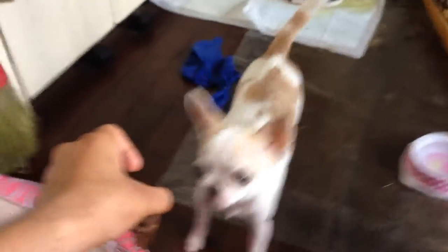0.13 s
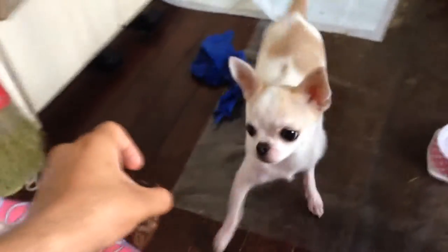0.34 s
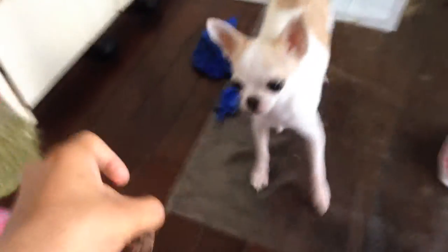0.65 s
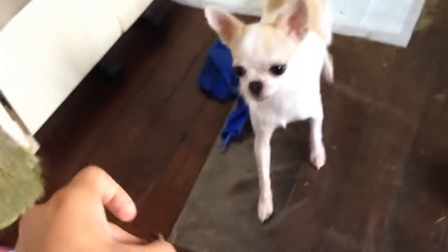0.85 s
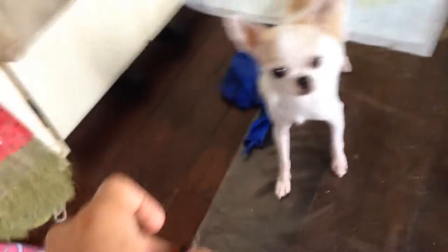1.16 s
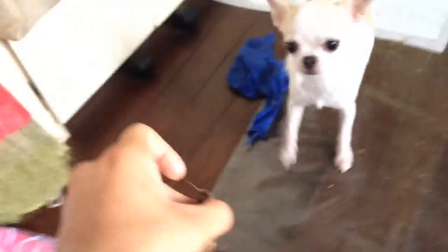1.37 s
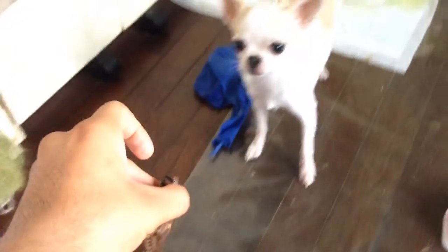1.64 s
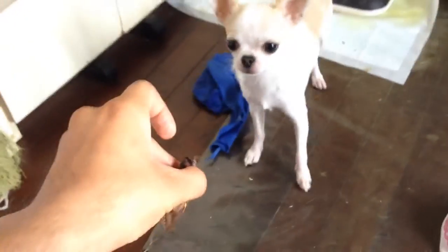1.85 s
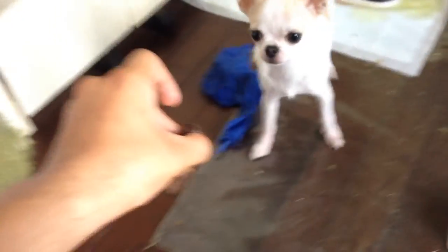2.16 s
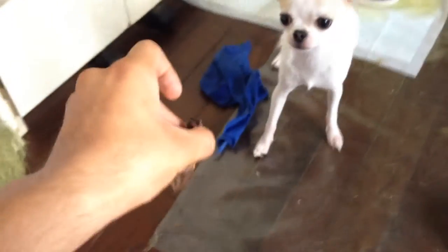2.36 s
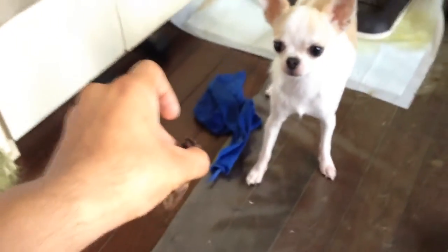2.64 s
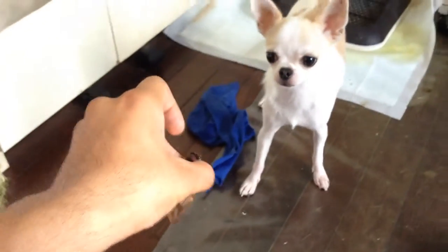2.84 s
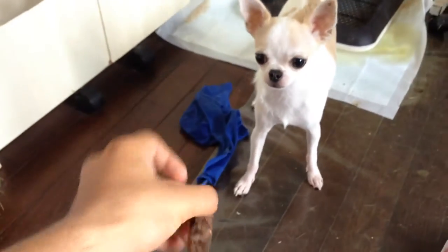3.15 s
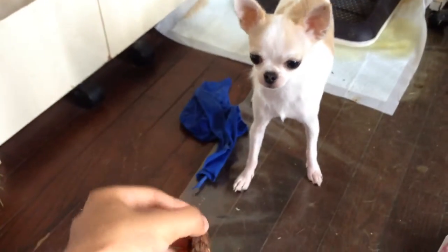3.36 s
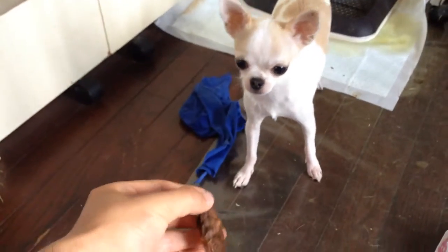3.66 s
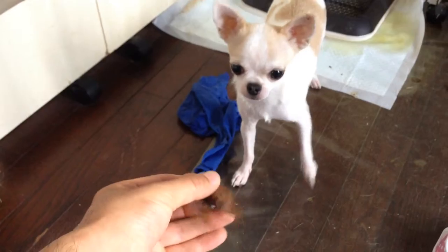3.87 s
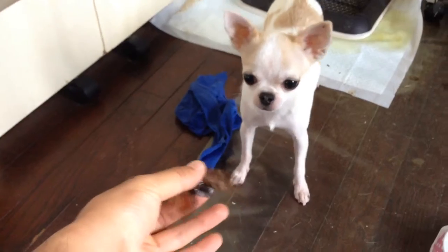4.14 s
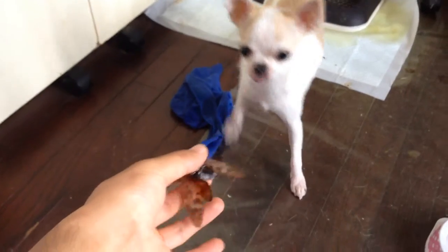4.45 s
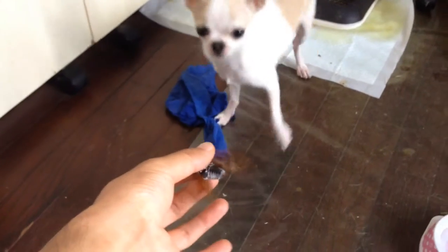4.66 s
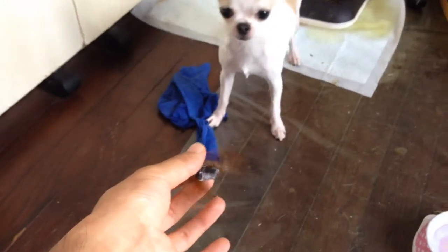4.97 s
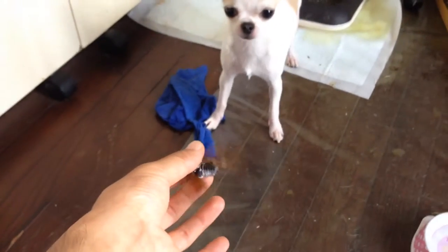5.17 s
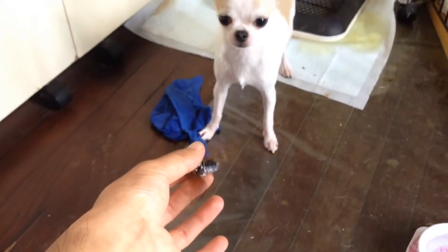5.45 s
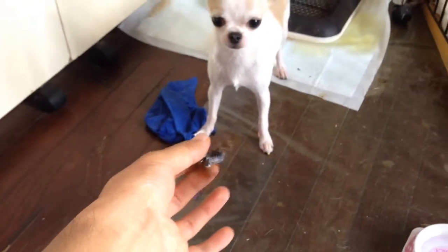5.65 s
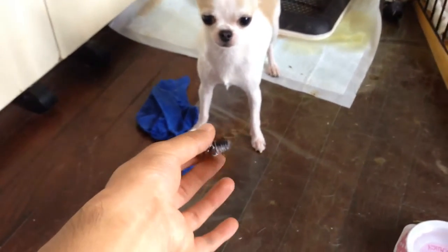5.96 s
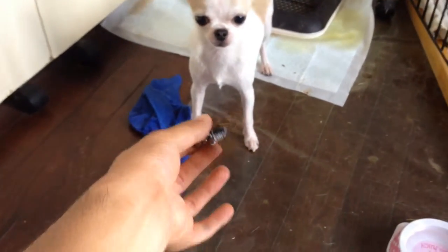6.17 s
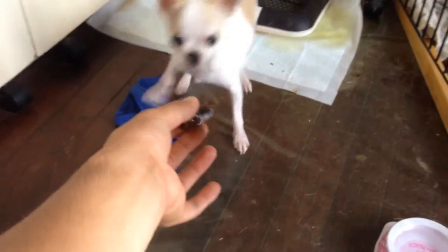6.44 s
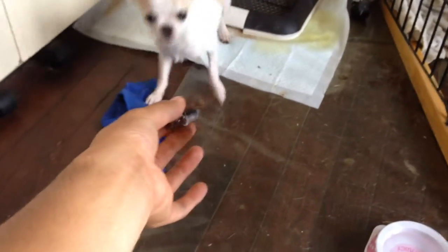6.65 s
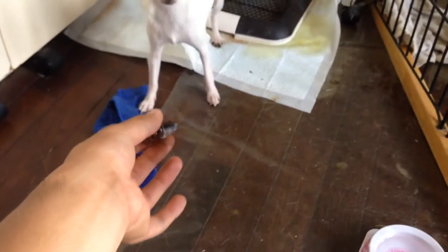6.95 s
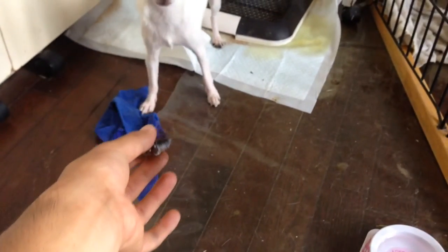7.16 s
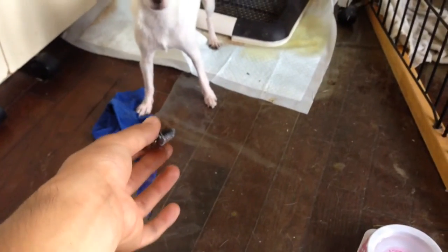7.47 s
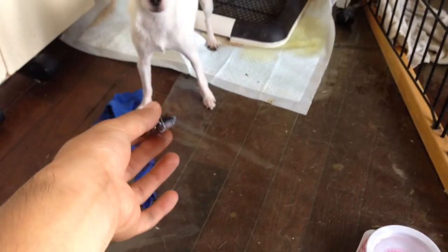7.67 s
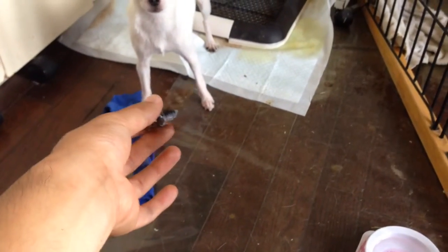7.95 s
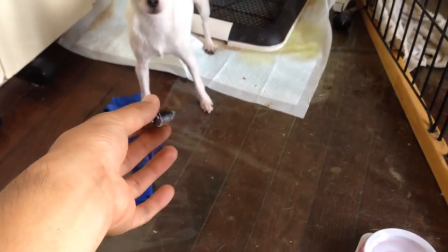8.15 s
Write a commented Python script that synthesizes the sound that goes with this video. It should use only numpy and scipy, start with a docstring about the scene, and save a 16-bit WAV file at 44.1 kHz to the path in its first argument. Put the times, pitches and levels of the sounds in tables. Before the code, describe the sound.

In a quiet room, a small dog steps softly on a wooden floor, a hand brushes cloth, and something hard clinks faintly twice. About three seconds in, a large cicada held in the fingers gives a few dry clicks and broken bursts, then buzzes loudly almost without a gap. The shrill buzz is close to the microphone and keeps dipping in pitch and snapping back, with a faint wing flutter beneath it.

```python
"""A quiet room with a wooden floor: a small dog steps about, a hand brushes cloth, something clinks twice.
Then a large cicada, held in the fingers, gives a few clicks, stutters and buzzes on with barely a gap.
Its two tymbals buckle in turn; each click rings higher and brighter the harder the insect tenses them.
The hollow abdomen colours the clicks and hums along, while the wings flutter against the fingers."""
import sys
import numpy as np
from scipy import signal
from scipy.fft import rfft, irfft
from scipy.io import wavfile
from scipy.ndimage import uniform_filter1d, minimum_filter1d

SR = 44100
rng = np.random.default_rng(int(sys.argv[2]) if len(sys.argv) > 2 else 0)


def generate_wav(signal):
    """Clip the signal to [-1, 1] and save it as 16-bit WAV at the path in sys.argv[1]."""
    frames = np.transpose(np.atleast_2d(signal))
    scaled = np.clip(frames, -1, 1) * 32767
    pcm = np.round(scaled).astype(np.int16)
    wavfile.write(sys.argv[1], SR, pcm)


N = 366471

# room tone colour: f/Hz, level/dB
AIR_EQ = [(25, -14), (50, 2), (95, 9), (170, 0.5), (260, 0.5), (450, -3), (800, -10), (1300, -9),
          (2400, -7), (5000, -11.5), (15000, -19.5)]
# room tone fader: t/s, level/dB
AIR_FADER = [(0, -60), (1.2, -60), (2.6, -62.5), (3.2, -62), (3.4, -67), (4.6, -76), (5.3, -69.5),
             (6.1, -67.5), (8.3, -63)]
# colour of skin on cloth: f/Hz, level/dB
CLOTH_EQ = [(60, -16), (200, -7.5), (520, 0), (1100, -8), (2600, -2.5), (4600, -3.5), (8000, -10),
            (15000, -17)]
# hand strokes at their fastest: t/s, level/dB, half length/s
CLOTH_STROKES = [(0.562, -59, 0.067), (0.773, -40.5, 0.081), (0.936, -63.5, 0.077), (1.365, -60, 0.045)]
# paws and claws on the boards: t/s, level/dB, centre f/Hz, spread/octaves, t60/s
PAW_STEPS = [(0.809, -45.5, 80, 0.71, 0.5), (0.821, -37, 270, 0.52, 0.23), (.82, -38.5, 690, 1.1, 0.065),
             (.97, -45, 76, 0.47, 0.28), (1.004, -57, 723, 1.03, 0.057), (1.068, -50.5, 2000, 1.3, 0.075),
             (1.077, -40.5, 746, 0.58, 0.071), (1.124, -43.5, 100, 0.71, 0.086),
             (1.612, -54, 1690, 1.06, 0.16), (1.698, -45.5, 7500, 1.5, 0.025),
             (2.091, -55, 109, 0.24, 0.11), (2.213, -43.5, 566, 0.15, 0.045),
             (2.214, -57.5, 1270, 0.18, 0.36), (2.214, -64.5, 2800, .6, 0.52),
             (2.4, -57.5, 1800, 0.77, .05)]
# contacts that make up the clinks: t/s, level/dB, scrape t60/s
CLINK_HITS = [(2.75, -46, 0.034), (2.758, -44.5, 0.24), (2.984, -50.5, 0.49)]
# modes of the clinking thing: f/Hz, relative level/dB, t60/s
CLINK_RING = [(2467, 16.5, 0.057), (2800, 5, 0.14), (4996, -18, 0.18), (6100, -13, 0.16), (8950, 0, 0.13)]
# colour of its scrape: f/Hz, level/dB
SCRAPE_EQ = [(300, -29), (1200, -13), (2500, 2.5), (5000, 0.5), (7500, -9.5), (10000, -11), (14000, -26)]

# tension the insect aims for, as tymbal ring pitch: t/s, f/Hz
TENSION_AIM = [(3.22, 4320), (3.272, 6410), (3.298, 5310), (3.53, 5000), (3.575, 5890), (3.612, 5280),
               (3.646, 6840), (3.73, 8020), (3.81, 7094), (4.7, 6790), (7, 6929), (8.3, 6663)]
# the muscle gives way and catches up: slackest t/s, sink time/s, depth/Hz, overshoot/Hz
TENSION_SAGS = [(3.868, 0.008, 663, 4), (3.963, 0.074, 500, -5), (4.206, 0.0092, 462, 0),
                (4.356, 0.0076, 650, 300), (4.48, 0.098, 1118, 752), (4.636, 0.047, 399, 159),
                (4.783, 0.019, 1060, 345), (4.953, 0.018, 550, 543), (5.126, 0.12, 1644, 1001),
                (5.19, 0.01, 794, -0.5), (5.412, 0.0096, 500, 9.5), (5.637, 0.015, 1050, 548),
                (5.75, 0.032, 1050, 748), (5.864, 0.061, 1930, 951.5), (5.986, 0.024, 552, -6),
                (6.093, 0.01, 900, 302.5), (6.182, 0.028, 1565, 397.5), (6.299, 0.033, 608, -2),
                (6.422, 0.012, 1103, -5.5), (6.566, 0.028, 1363, 204), (6.866, 0.054, 702.5, 51.5),
                (6.932, 0.01, 707, 2), (7.056, 0.057, 300.6, 1050), (7.16, 0.11, 702, 955.5),
                (7.328, 0.12, 1434, 1293), (7.457, 0.097, 605, 255), (7.55, 0.082, 498.4, 947.5),
                (7.652, 0.044, 1066, 397), (7.829, 0.045, 1554, 504), (7.933, 0.033, 1713, 748),
                (8.112, 0.009, 395.7, 9), (8.218, 0.015, 148.9, 740)]
# pace of both tymbals at singing tension, tiring slowly: t/s, click rate/Hz
CLICK_PACE = [(3.23, 410), (3.41, 340), (3.57, 395), (3.8, 364), (4.4, 353), (5, 349), (5.6, 333),
              (6.5, 346), (7.7, 339), (8.3, 345)]
# colour of the wing flutter: f/Hz, level/dB
WING_EQ = [(60, -17), (200, -7.5), (400, -6.5), (800, -3.5), (1600, -2.5), (3000, 0.5), (10000, -39)]
# the shaking body: t/s, flutter level/dB, thrum level/dB
BODY_SHAKE = [(3.1, -82, -100), (3.3, -57.5, -100), (3.75, -69.5, -97), (4, -55.5, -93), (4.3, -62, -81),
              (5.1, -61, -85), (5.45, -61.5, -74), (6.1, -57, -65.5), (7.1, -59.5, -74), (7.5, -57, -67),
              (8.3, -60.5, -71)]
# the abdomen's hum: t/s, resonance at singing tension f/Hz, level/dB, stroke unsteadiness/ratio
ABDOMEN_HUM = [(3.5, 2490, -48, .004), (3.62, 2630, -44, 0.0017), (3.8, 2630, -45, 0.0037),
               (4, 2750, -44.5, 0.019), (4.4, 2720, -54.5, 0.0058), (5.2, 2640, -58, 0.0085),
               (5.6, 2727, -51, 0.016), (6.2, 2779, -54, 0.0087), (8.3, 2676, -49, 0.024)]
# unbroken runs of the buzz: start t/s, end t/s
BUZZ_RUNS = [(3.217, 3.375), (3.4025, 3.421), (3.526, 4.465), (4.476, 5.08), (5.133, 5.747), (5.758, 5.843),
             (5.876, 7.931), (7.944, 8.31)]
# strength of the song, before make-up gain: t/s, ring level/dB, overtone level at singing tension/dB
SONG_EFFORT = [(3.22, -23.5, -10.5), (3.27, -18.5, -11.5), (3.53, -21, -13.5), (3.61, -16.5, -7.5),
               (3.72, -24, -17.5), (3.95, -19.5, -13.5), (4.1, -23, -17.5), (4.45, -20, -18),
               (4.95, -20.5, -17.5), (5.155, -23, -19.5), (5.2, -26, -21.5), (5.55, -21, -18),
               (5.9, -23, -18.5), (6, -23, -19.5), (6.7, -21, -16), (7.4, -22.5, -16.5), (8.3, -22.5, -16)]
# how the insect is held: t/s, abdomen tuning/ratio, second tymbal level/dB, floor echo delay/s
GRIP = [(3.25, 0.821, 0, 0.002), (3.55, 0.85, -4, 0.0016), (3.72, 0.95, 1, 0.0017), (4.3, 1, 2, 0.0022),
        (4.6, 1, -8, 0.0018), (5.35, 0.99, -8.5, 0.0018), (5.7, 1, -9.5, .0018), (6, 0.99, -8, .002),
        (6.7, 1, -10, 0.002), (7.4, 0.98, -3.5, .0021), (8.3, 0.97, -8, 0.0021)]
# lone slack clicks, before make-up gain: t/s, ring f/Hz, ring level/dB, overtone level/dB
LONE_CLICKS = [(.2233, 4800, -24, -28), (3.1105, 4870, -21.5, -27.5), (3.1283, 5040, -21, -22),
               (3.1328, 5000, -15.5, -28), (3.1398, 5080, -32, -22), (3.1562, 4600, -23, -21.5),
               (3.1604, 4630, -19, -23), (3.1664, 4700, -29, -31), (3.1733, 4930, -18.5, -31),
               (3.4793, 5300, -19, -22), (3.4883, 5230, -21, -34)]
# the tymbal's two modes: ring f/Hz, overtone f/Hz
TYMBAL_MODES = [(4700, 10640), (5300, 11670), (5900, 12430), (6700, 14650), (8000, 16960)]
# colour of the hollow abdomen at tuning 1: f/Hz, level/dB
ABDOMEN_EQ = [(300, -64), (1200, -30), (1900, -15.5), (2250, -3), (2560, -1), (2740, 6.5), (2960, -4),
              (4600, -8.5), (5150, 9), (5600, 6), (7000, 3.5), (9300, -5), (15000, -44)]
# the small tymbal radiates its overtone best in the top octave: f/Hz, level/dB
OVERTONE_EQ = [(3000, -13), (7500, -3.5), (9300, -6.5), (11000, -4.5), (14000, 1)]
# the dry snap of the ribs: f/Hz, level/dB
SNAP_EQ = [(1000, -55), (3000, -21), (7500, -15.5), (9500, -11), (11500, 0.5), (15000, -1)]


def amp(db):
    """Decibels to gain."""
    return 10 ** (np.asarray(db) / 20)


def unit_rms(x):
    """Scales to rms 1."""
    return x / np.sqrt(np.mean(x ** 2) + 1e-20)


def unit_energy(x):
    """Scales each row to energy 1."""
    return x / (np.linalg.norm(x, axis=-1, keepdims=True) + 1e-12)


def follow(table, s):
    """The columns of an automation curve at the times s."""
    at, *columns = np.transpose(table)
    return [np.interp(s, at, c) for c in columns]


def curve_at(points, hz):
    """Reads a curve on a log-frequency axis."""
    f, value = np.transpose(points)
    return np.interp(np.log(hz + 1), np.log(f + 1), value)


def swell(t, width_s):
    """A smooth swell of height 1 around t = 0."""
    return np.exp(-(t / width_s) ** 2)


def add(mix, s, sound):
    """Mixes a sound in at time s."""
    part = mix[max(round(s * SR), 0):][:len(sound)]
    part += sound[:len(part)]


def noise(eq, size=N):
    """Noise of rms 1 through an EQ curve."""
    gain = amp(curve_at(eq, np.fft.rfftfreq(size, 1 / SR)))
    return unit_rms(irfft(rfft(rng.standard_normal(size)) * gain, size))


def band(hz, octaves, size=N):
    """Noise of rms 1 in a bell-shaped band."""
    away = np.log2((np.fft.rfftfreq(size, 1 / SR) + 1) / hz) / octaves
    return unit_rms(irfft(rfft(rng.standard_normal(size)) * np.exp(-away ** 2 / 2), size))


def room_tone():
    """The bed: low rumble and faint hiss."""
    return noise(AIR_EQ) * amp(follow(AIR_FADER, np.arange(N) / SR)[0])


def reverb(x, mid_t60=.14, top_t60=.17, first_s=.0018, top_db=-1, size=16384, count=6, drift_per_s=3.5):
    """Sparse reflections of a small room that shift as the hand moves."""
    taps = rng.standard_normal((count, size)) * (rng.random((count, size)) < .12)
    taps *= np.arange(size) > first_s * SR
    hz, t, spectra = signal.stft(taps, SR, nperseg=128)
    t60 = curve_at([(4000, mid_t60), (14000, top_t60)], hz)[:, None]
    colour_db = curve_at([(6000, 0), (14000, top_db)], hz)[:, None]
    tails = unit_energy(signal.istft(spectra * amp(colour_db - 60 * t / t60), SR, nperseg=128)[1])
    place = (np.arange(N) / SR * drift_per_s - np.arange(count)[:, None]) % count
    crossfade = np.sin(np.pi / 2 * np.minimum(place, 2))  # each set of paths fades into the next
    return signal.oaconvolve(x * crossfade, tails, axes=1)[:, :N].sum(0)


def cloth_brush():
    """Skin sliding over cloth: a swish that swells and fades with each stroke."""
    t = np.arange(N) / SR
    return noise(CLOTH_EQ) * sum(amp(db) * swell(t - s, half_s) for s, db, half_s in CLOTH_STROKES)


def dog_steps(size=16384):
    """Soft pads thud and claws tick on the boards."""
    out, t = np.zeros(N), np.arange(size) / SR
    for s, db, hz, octaves, t60 in PAW_STEPS:
        attack = 1 - np.exp(-2 * hz * t)
        add(out, s, band(hz, octaves, size) * amp(db - 60 * t / t60) * attack)
    return out


def clinks(ring_db=-11, size=16384):
    """Across the room, something hard scrapes briefly and rings."""
    out, t = np.zeros(N), np.arange(size) / SR
    for s, db, scrape_t60 in CLINK_HITS:
        modes = sum(amp(mode_db - 60 * t / t60) * np.sin(2 * np.pi * (hz * t + rng.random()))
                    for hz, mode_db, t60 in CLINK_RING)
        scrape = noise(SCRAPE_EQ, size) * amp(-60 * t / scrape_t60)
        add(out, s, amp(db) * (scrape + amp(ring_db) * modes))
    return out


def tension(s, snap_back_s=.014, overshoot_after_s=.043, overshoot_s=.014):
    """Tymbal tension as ring pitch in Hz: each sag sinks, snaps back and may overshoot."""
    t = np.arange(0, N, 44) / SR
    hz = follow(TENSION_AIM, t)[0]
    for at, sink_s, depth_hz, overshoot_hz in TENSION_SAGS:
        hz -= depth_hz * swell(t - at, np.where(t < at, sink_s, snap_back_s))
        hz += overshoot_hz * swell(t - at - overshoot_after_s, overshoot_s)
    return np.interp(s, t, hz)


def strain(s, slack_per_khz, taut_per_khz=0, singing_hz=6790):
    """Modulation by tension: one slope below the singing tension, another above it."""
    khz = (tension(s) - singing_hz) / 1000
    return khz * np.where(khz < 0, slack_per_khz, taut_per_khz)


def click_rate(s):
    """Clicks per second of both tymbals: slack ones beat more slowly."""
    return follow(CLICK_PACE, s)[0] + strain(s, slack_per_khz=18, taut_per_khz=8)


def wings(flap_hz=26, thrum_hz=165):
    """Wings on the fingers: a papery flutter over the body's low thrum; both ease off in the sags."""
    t = np.arange(N) / SR
    flap_db = 2.4 * np.clip(band(flap_hz, octaves=.7), -1.8, 1.8)
    flutter_db, thrum_db = follow(BODY_SHAKE, t)
    shake = noise(WING_EQ) * amp(flutter_db) + band(thrum_hz, octaves=.38) * amp(thrum_db)
    return shake * amp(flap_db + strain(t, slack_per_khz=4))


def abdomen_hum(width_hz=260, waver_hz=22, odd_db=-4):
    """The regular muscle stroke pumps the abdomen: harmonics near its resonance sing and warble."""
    t = np.arange(N) / SR
    centre_hz, db, unsteady = follow(ABDOMEN_HUM, t)
    centre_hz += strain(t, slack_per_khz=89)  # the resonance drops in the sags
    stroke_hz = click_rate(t) / 2 * (1 + unsteady * band(waver_hz, octaves=.98))
    turns = np.cumsum(stroke_hz) / SR
    orders = np.arange(12, 19)[:, None]
    weight = amp(odd_db * (orders % 2)) / (1 + (2 * (orders * stroke_hz - centre_hz) / width_hz) ** 2)
    tone = (weight * np.sin(2 * np.pi * orders * turns)).sum(0) / np.sqrt((weight ** 2).sum(0) / 2)
    gate = sum((t > start) & (t < end) for start, end in BUZZ_RUNS)
    return tone * amp(db) * uniform_filter1d(gate.astype(float), size=200)


def buckles(wander=.008, wander_hz=22, throb_hz=26, throb_depth=.038, throb_db=2.2, jitter_s=.00008,
            slack_jitter_s=.000296, limp_s=.00008, uneven_db=.5, detune=.011, overtone_share=.38):
    """The tymbals buckle in turn, a row per click: t/s, ring f/Hz, ring level/dB, overtone level/dB."""
    t = np.arange(N) / SR
    turns = np.cumsum(click_rate(t) * (1 + wander * band(wander_hz, octaves=.9))) / SR
    s = np.concatenate([np.interp(np.arange(*np.interp(run, t, turns)), turns, t) for run in BUZZ_RUNS])
    second = np.arange(len(s)) % 2
    ring_hz = tension(s)
    ring_db, overtone_db = follow(SONG_EFFORT, s)
    overtone_db += strain(s, slack_per_khz=6.5, taut_per_khz=4)  # tauter is brighter
    late, strong, sharp = rng.standard_normal((len(s), 3)).T
    slack = np.clip((6300 - ring_hz) / 900, 0, 1)
    # the tensing muscle trembles: pitch and brightness throb together
    throb = np.interp(s, t, band(throb_hz, octaves=.38)) * (1 - slack / 2)
    ring_hz *= 1 + throb_depth * throb + detune * sharp
    # one tymbal is often weaker, which adds a rough tone an octave down
    second_gain = amp(follow(GRIP, s)[1])
    side_gain = np.where(second, second_gain, 1)
    side_db = 20 * np.log10(side_gain / np.sqrt((1 + second_gain ** 2) / 2)) + uneven_db * strong
    overtone_db += overtone_share * side_db + throb_db * throb
    # a weak or slack tymbal keeps looser time
    s = s + (jitter_s / side_gain + slack_jitter_s * slack) * late + limp_s * second
    return np.column_stack([s, ring_hz, ring_db + side_db, overtone_db])


def tymbal_mode(t, hz, rise_s, decay_s, bend, bend_s=.00029):
    """A damped ring that glides up to its pitch as the ribs snap inwards."""
    turns = hz[:, None] * (t - bend * bend_s * (1 - np.exp(-t / bend_s)))
    return np.sin(2 * np.pi * turns) * (1 - np.exp(-t / rise_s)) * np.exp(-t / decay_s)


def resonate(clicks, eq, tuning=1):
    """Minimum-phase EQ that rings after each click; each comes out at energy 1."""
    hz = np.fft.fftfreq(clicks.shape[-1], 1 / SR)
    log_gain = np.log(amp(curve_at(eq, abs(hz) / tuning)))
    response = np.exp(np.conj(signal.hilbert(log_gain)))
    return unit_energy(np.fft.ifft(np.fft.fft(clicks) * response).real)


def cicada(ring_makeup_db=18.5, overtone_makeup_db=16, crackle_db=-13, crackle_s=.0012,
           taut_snap_db=-7, slack_snap_db=3, echo_db=-9, sway_s=.00004, sway_hz=7, size=768):
    """Each click snaps and rings two tymbal modes; the abdomen colours the lower, the floor echoes both."""
    s, ring_hz, ring_db, overtone_db = np.vstack([LONE_CLICKS, buckles()]).T
    tuning, _, echo_s = follow(GRIP, s)
    echo_s += sway_s * np.interp(s, np.arange(N) / SR, band(sway_hz, octaves=1))  # the hand sways
    start = np.floor(s * SR) / SR
    t = np.maximum(np.arange(size) / SR - (s - start)[:, None], 0)
    crackle = unit_energy(rng.standard_normal(t.shape) * np.exp(-t / crackle_s))
    ring = unit_energy(tymbal_mode(t, ring_hz, rise_s=.00008, decay_s=.00045, bend=.0057))
    body = resonate(ring + amp(crackle_db) * crackle, ABDOMEN_EQ, tuning[:, None])
    overtone_hz = follow(TYMBAL_MODES, ring_hz)[0]
    overtone = tymbal_mode(t, overtone_hz, rise_s=.00011, decay_s=.00038, bend=.23)
    # a slack tymbal snaps dryly, a taut one rings
    snap_db = np.interp(ring_hz, [4800, 6200], [slack_snap_db, taut_snap_db])
    snap = amp(snap_db)[:, None] * resonate(crackle, SNAP_EQ)
    top = unit_energy(resonate(overtone, OVERTONE_EQ) + snap)
    clicks = amp(ring_db + ring_makeup_db)[:, None] * body
    clicks += amp(overtone_db + overtone_makeup_db)[:, None] * top
    hz = np.fft.fftfreq(size, 1 / SR)
    floor_echo = 1 + amp(echo_db) * np.exp(-2j * np.pi * hz * echo_s[:, None])
    out = np.zeros(N)
    for at, click in zip(start, np.fft.ifft(np.fft.fft(clicks) * floor_echo).real):
        add(out, at, click)
    return out


def scene(send_db=-3):
    """Mono mix on two channels: song, steps and clinks feed the reverb; the rest stays dry."""
    near = cicada() + abdomen_hum()
    far = dog_steps() + clinks()
    mono = near + far + reverb(amp(send_db) * (near + far)) + wings() + cloth_brush() + room_tone()
    return np.array([mono, mono])


def record(dry, ceiling=.66, window=177, cutoff_hz=15280):
    """A quick limiter holds down the tallest clicks, then a steep low-pass trims the top."""
    needed_gain = ceiling / np.maximum(abs(dry).max(0), ceiling)
    gain = uniform_filter1d(minimum_filter1d(needed_gain, window), window)
    lowpass = signal.firwin(601, cutoff_hz, window=("kaiser", 8), fs=SR)
    return signal.oaconvolve(dry * gain, lowpass[None], "same")


dry = scene()
out = record(dry)
generate_wav(out)
```